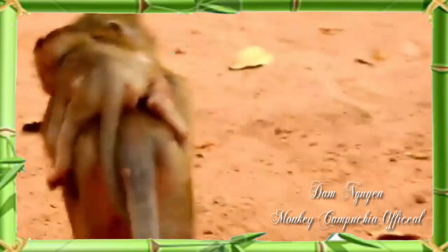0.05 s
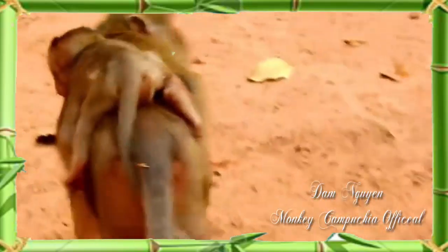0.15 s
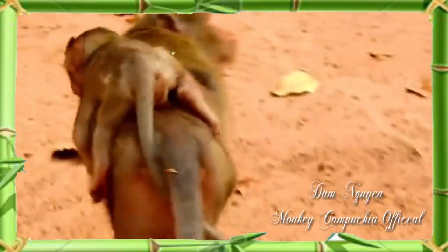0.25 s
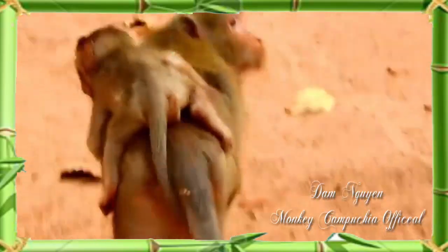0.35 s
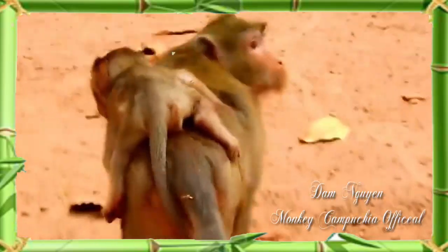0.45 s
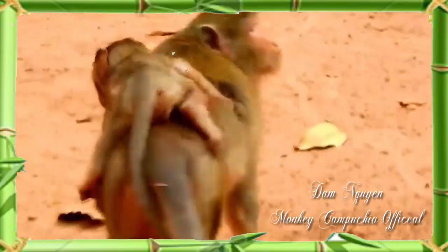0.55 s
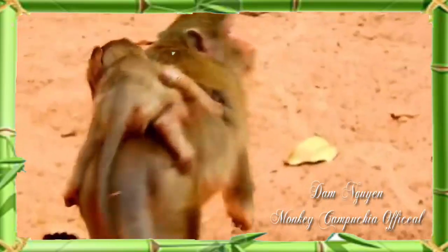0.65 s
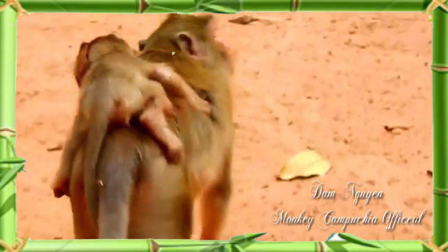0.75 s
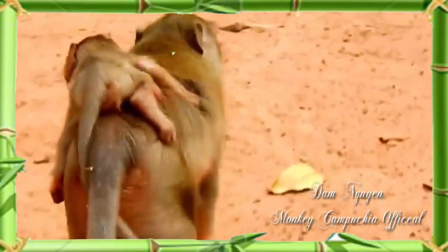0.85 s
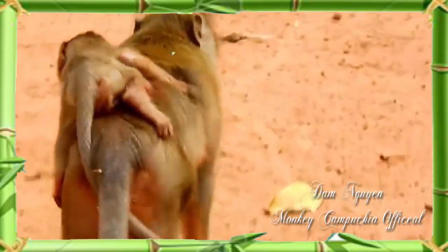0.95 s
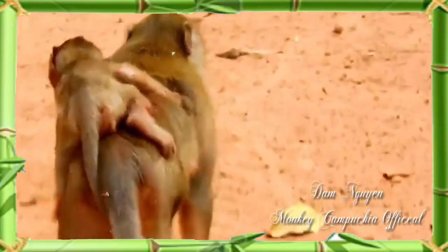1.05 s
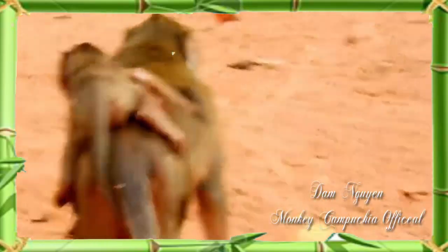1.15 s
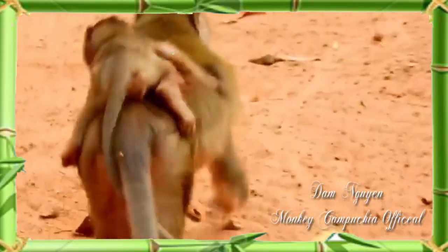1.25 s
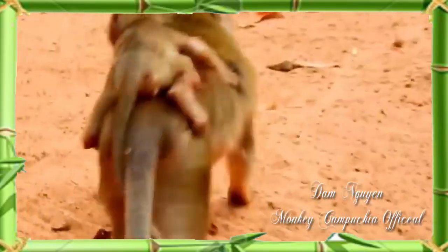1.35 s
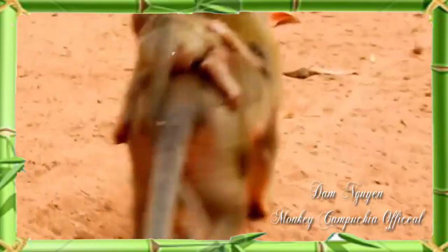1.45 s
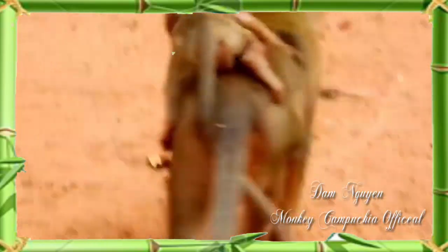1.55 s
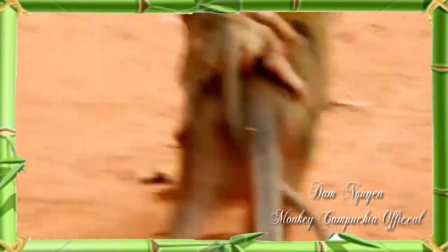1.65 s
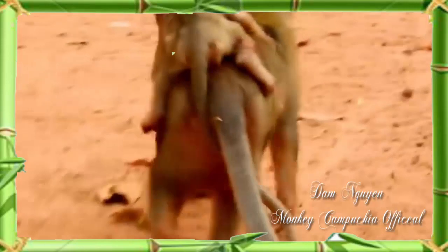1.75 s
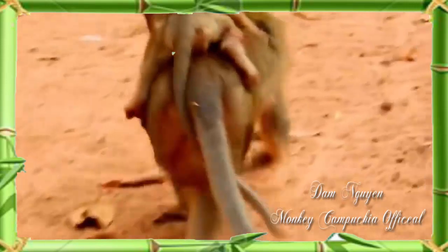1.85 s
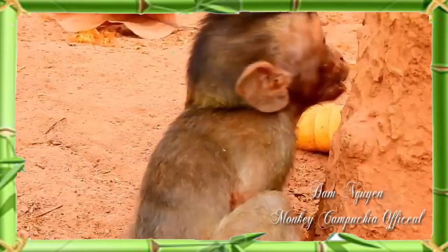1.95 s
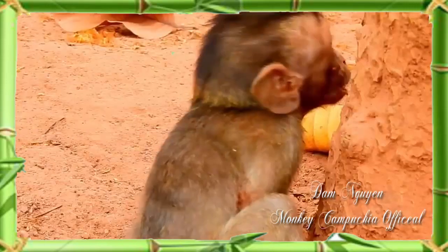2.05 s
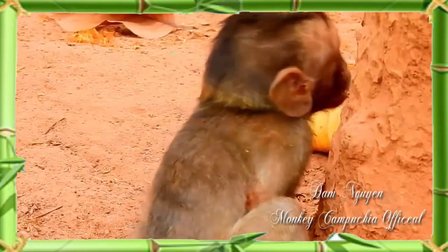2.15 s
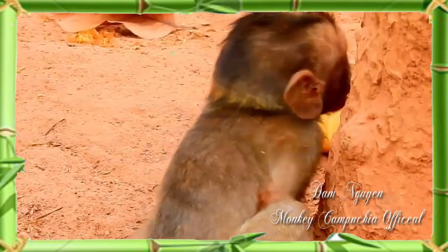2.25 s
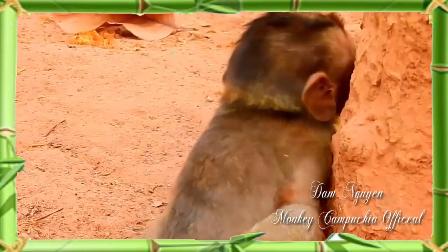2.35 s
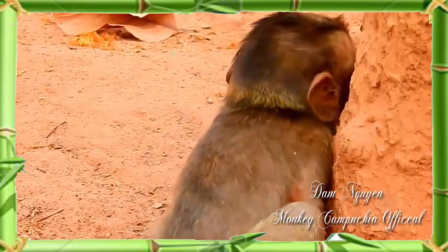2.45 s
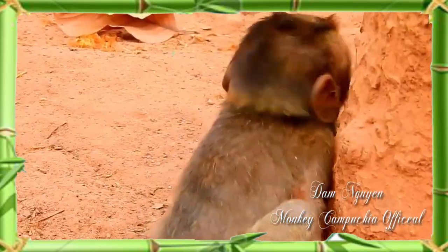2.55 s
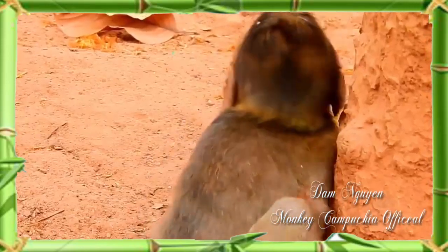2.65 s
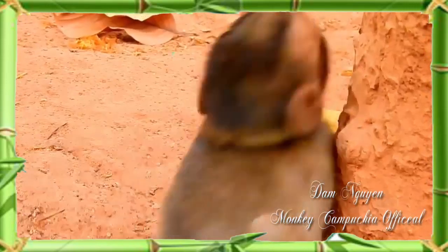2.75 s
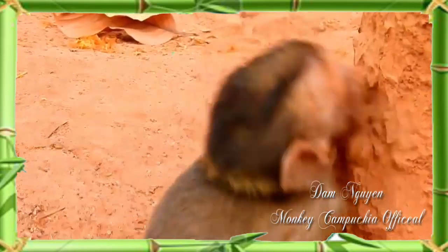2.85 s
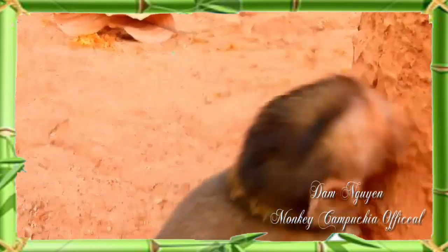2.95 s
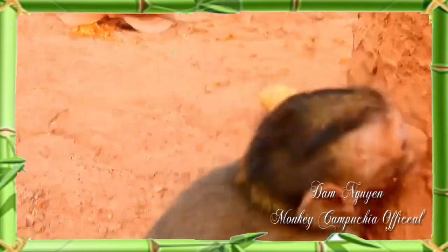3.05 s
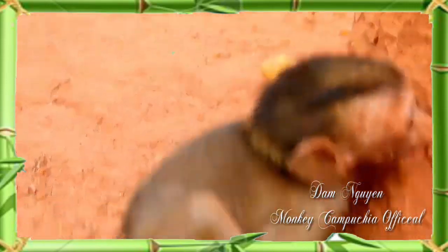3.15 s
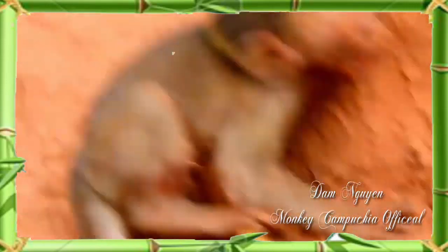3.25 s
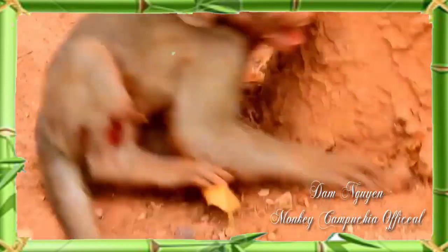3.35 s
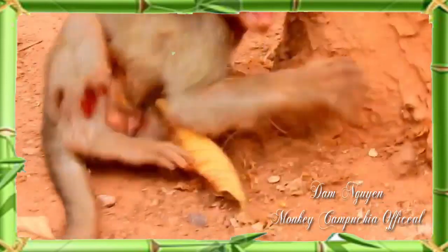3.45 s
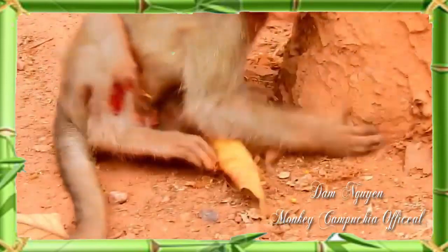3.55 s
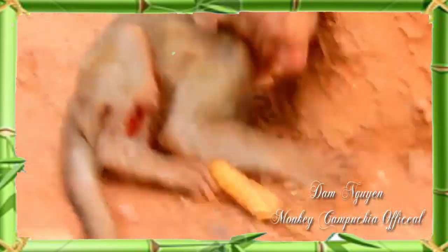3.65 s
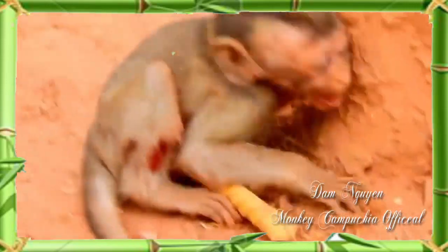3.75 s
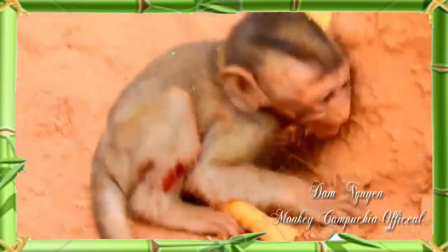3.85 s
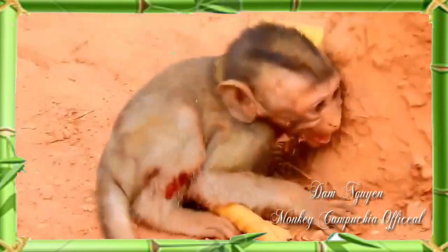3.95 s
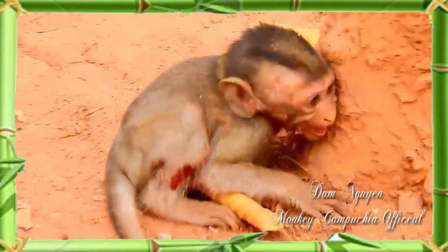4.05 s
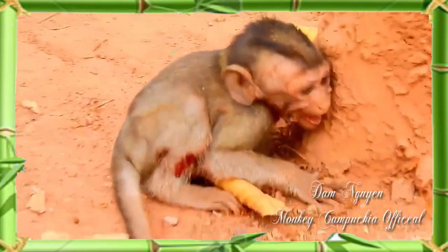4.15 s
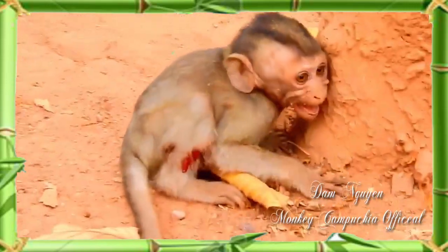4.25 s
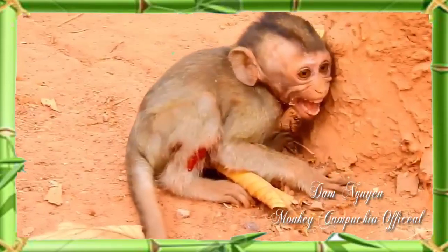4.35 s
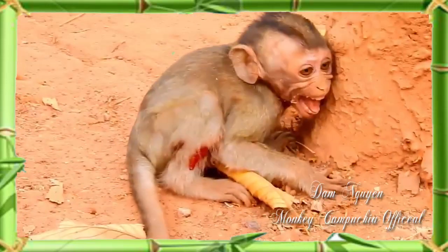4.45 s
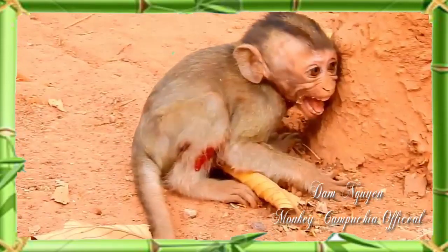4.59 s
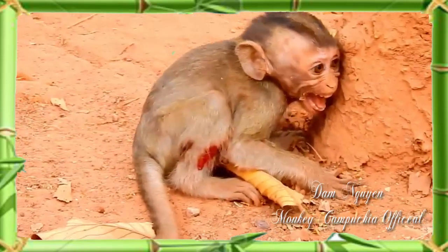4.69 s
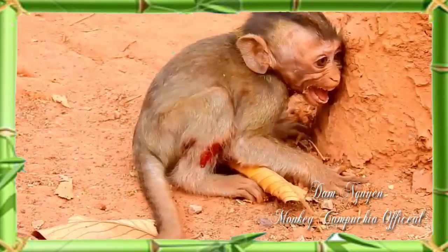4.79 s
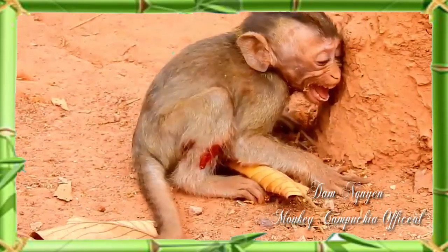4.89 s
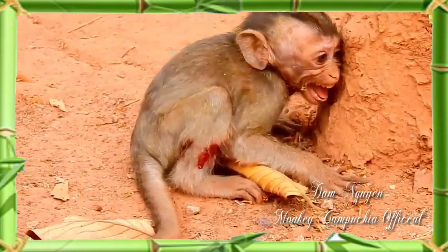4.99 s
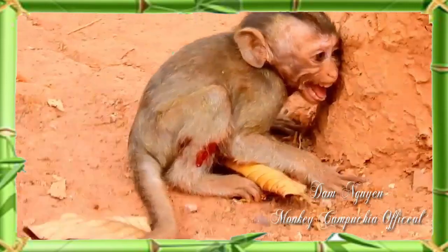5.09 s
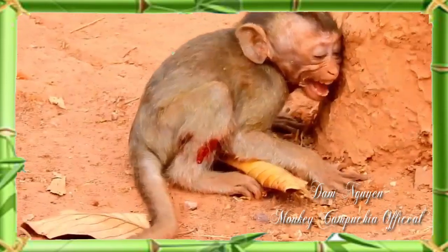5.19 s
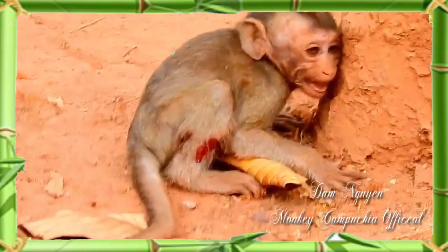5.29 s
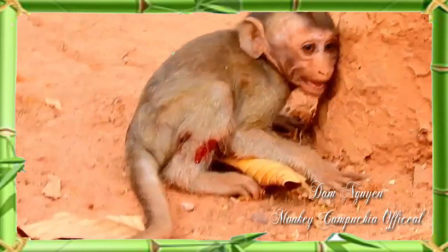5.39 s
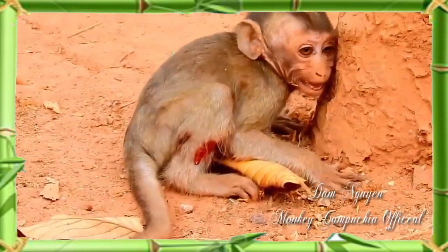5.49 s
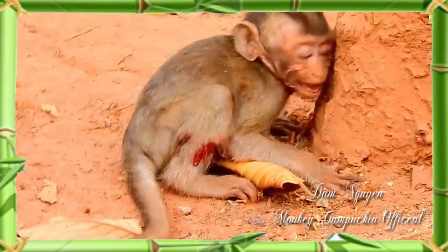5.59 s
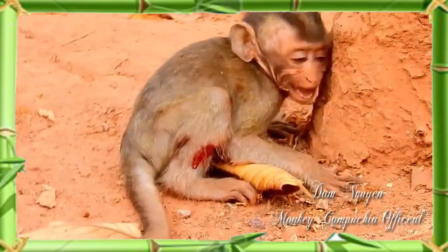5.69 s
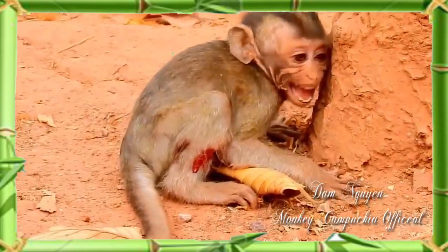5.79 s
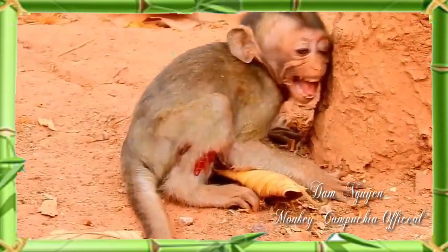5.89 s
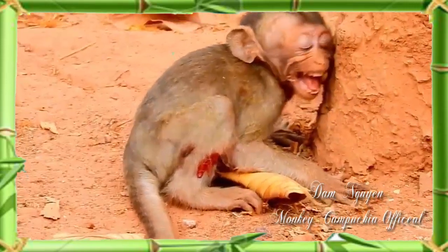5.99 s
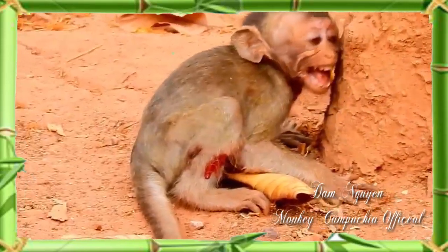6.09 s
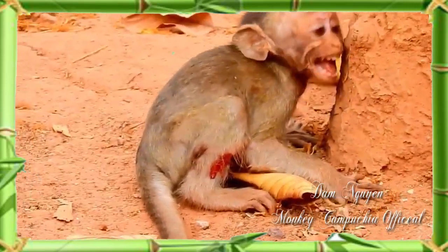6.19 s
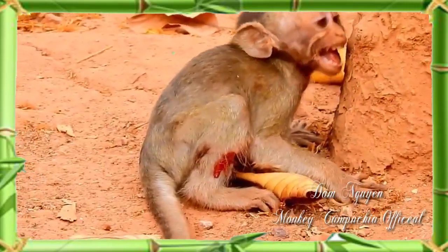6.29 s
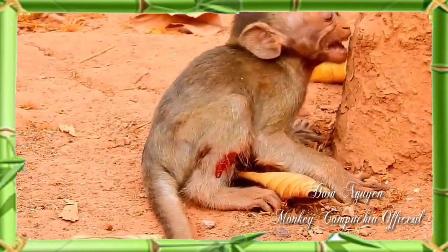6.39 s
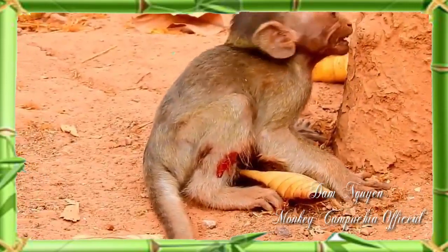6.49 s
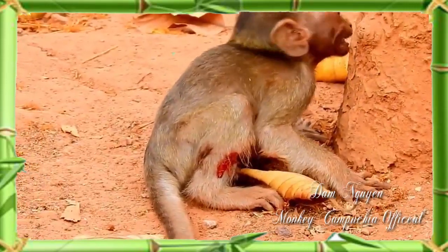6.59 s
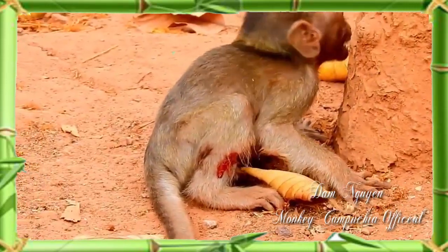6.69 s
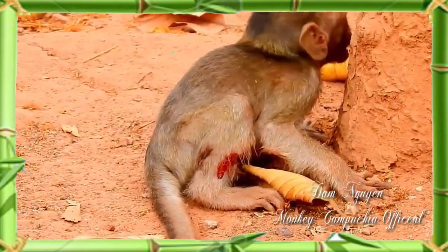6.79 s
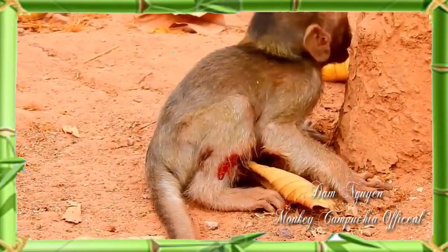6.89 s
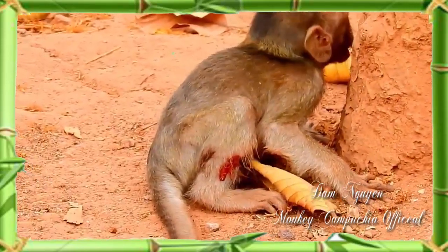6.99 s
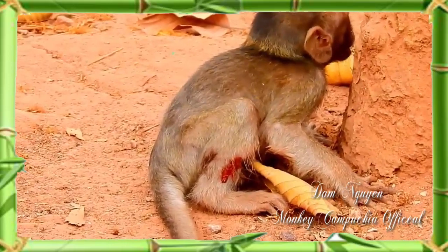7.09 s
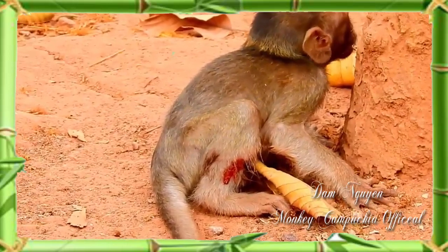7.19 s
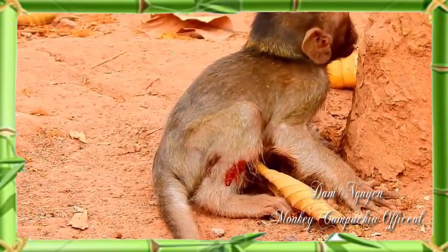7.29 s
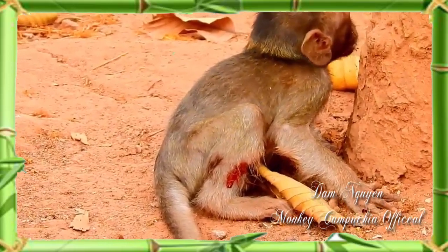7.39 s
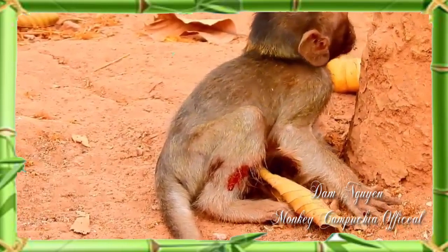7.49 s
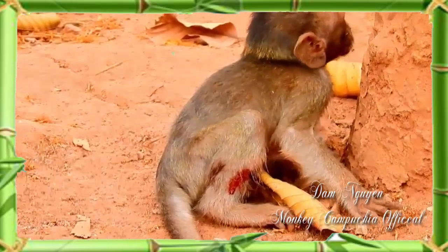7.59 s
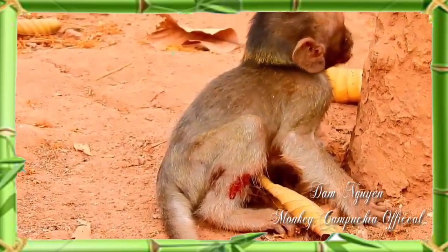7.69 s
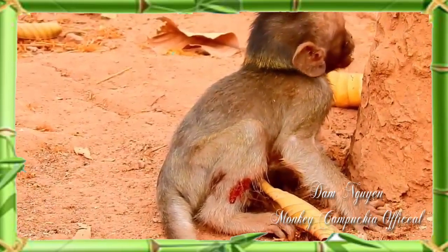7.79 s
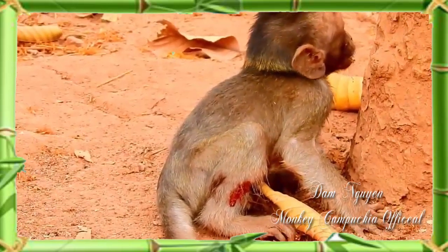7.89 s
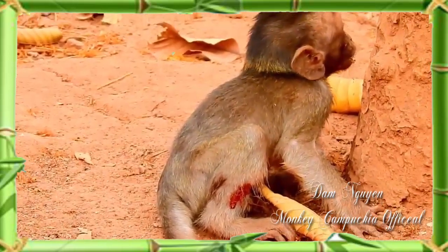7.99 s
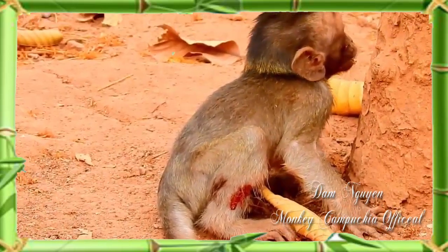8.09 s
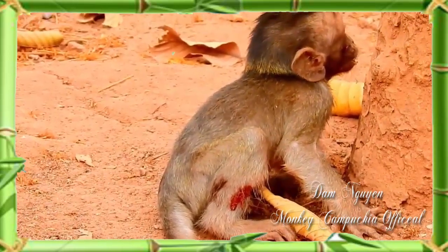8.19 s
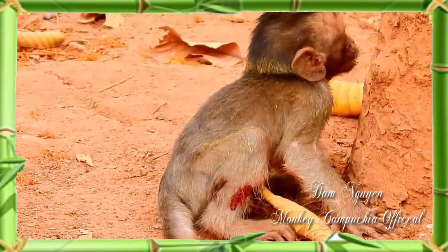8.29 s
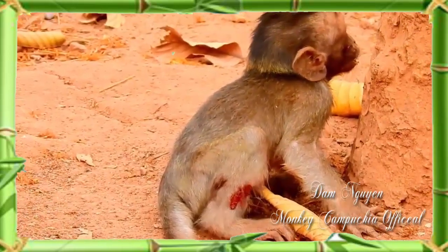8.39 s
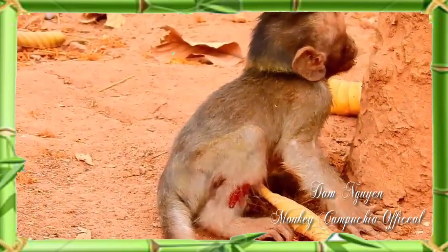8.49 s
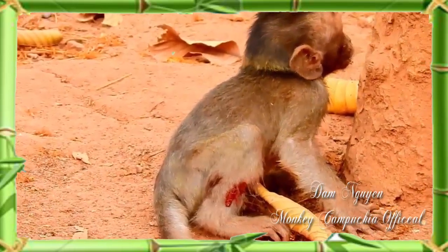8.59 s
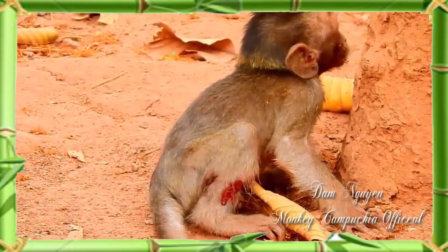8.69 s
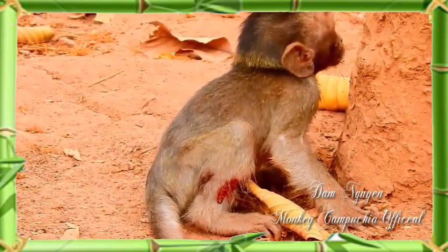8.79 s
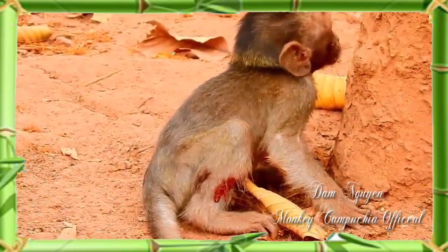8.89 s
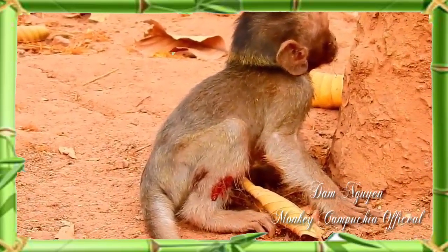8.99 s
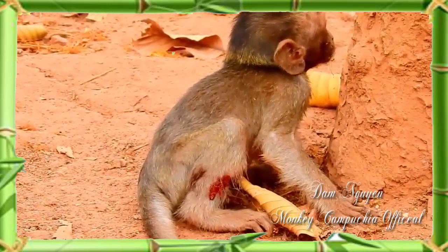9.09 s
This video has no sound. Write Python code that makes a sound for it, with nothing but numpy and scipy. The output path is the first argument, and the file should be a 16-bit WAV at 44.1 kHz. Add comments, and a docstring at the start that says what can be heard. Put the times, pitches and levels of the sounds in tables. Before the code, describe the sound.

Young monkeys on dry, open ground, heard close with very slight scattered echo. From 0 to 1.6 s, short hoarse barks and leaf swishes come in uneven bursts, with throaty grunts, a falling squeak and ticks of grit over a faint distant engine hum. At 2 s the windy background jumps up and a clear coo around 1500 Hz lasts a third of a second. Small rustles and squeaks lead to a harsh, torn scream from 2.8 to 4 s, shaking rapidly, with a tiny dropout near 3.85. At 4.4 s a piercing whistle sweeps up to about 10 kHz over rasp, trembling until 5.3; swishes and squeaks follow, then another shriek from 5.9 to 6.4 breaks into gasps. Wind and scuffing are louder here, then drop. A strong fluttering coo comes at 6.8-7.3, a weaker one at 7.8-8.5, leaving hum, scuffing and insect-like hiss slightly rising to the end.

```python
"""Young monkeys on dry ground, about nine seconds. First come hoarse barks and leaf swishes, made of lumpy noise
through moving resonances, with grunts and short gliding squeaks here and there; at 2 s a clear coo, built from
overtones. A harsh scream of fold pulses runs from 2.8 to 4 s, with a brief dropout, then whistled screams until
6.4 s; all shake with the body's tremor. Two more coos follow. Scuffing and a far engine's hum (tones and filtered
noise), wind and a hiss lie underneath, jumping in level near 2, 4 and 6.4 s; ringing bursts make ticks of grit."""
import sys
import numpy as np
from scipy import signal
from scipy.fft import rfft, irfft, next_fast_len
from scipy.io import wavfile
from scipy.ndimage import uniform_filter1d, map_coordinates

SR = 44100
rng = np.random.default_rng(int(sys.argv[2]) if len(sys.argv) > 2 else 0)


def unload_audio(sound):
    """Save the sound as a 16-bit wav file, at the path given as the first command line argument."""
    columns = np.transpose(np.atleast_2d(sound))
    # keep every value between -1 and 1, then stretch to whole-number steps
    steps = np.round(np.clip(columns, -1, 1) * 32767)
    wavfile.write(sys.argv[1], SR, steps.astype(np.int16))


def attenuation_scalar(level_db):
    """Turn a level in dB into a linear amplitude multiplier (20 dB per decade)."""
    decades = np.asarray(level_db, float) / 20
    return 10 ** decades


N = 403074
T = np.arange(N) / SR  # time of each sample in seconds


def unit(x):
    """Scales a sound to rms 1."""
    return x / np.sqrt(np.mean(x ** 2) + 1e-20)


def curves(tables, silent=None):
    """One value per sample for each column; with silent, the first two columns fall to it around each table."""
    rows = []
    for table in tables:
        if silent is None:
            rows += table
        else:
            first, last = table[0], table[-1]
            before = (first[0] - .002, silent, silent, *first[3:])
            after = (last[0] + .002, silent, silent, *last[3:])
            rows += [before, *table, after]
    s, *columns = np.transpose(rows)
    return [np.interp(T, s, column) for column in columns]


def turning(hz):
    """The phase in radians of a tone whose pitch follows hz."""
    return 2 * np.pi * np.cumsum(hz) / SR


def wobble(rate):
    """A smooth random curve through rate random points a second."""
    return map_coordinates(rng.standard_normal(int(N * rate / SR) + 4), [T * rate])


def torn(phase, width_hz):
    """A tone whose strength and sign leap about at random: a ragged band around its pitch."""
    return unit(wobble(width_hz) * np.sin(phase) + wobble(width_hz) * np.cos(phase))


def coloured(x, spectrum, lo_hz=0, hi_hz=SR):
    """Filters x through a spectrum between two edges, then scales it to rms 1."""
    size = next_fast_len(N + 8192)
    hz = np.fft.rfftfreq(size, 1 / SR)
    points_hz, points_db = np.transpose(spectrum)
    gain = attenuation_scalar(np.interp(np.log(hz + 1), np.log(points_hz + 1), points_db))
    gain = gain * (hz >= lo_hz) * (hz < hi_hz)
    return unit(irfft(rfft(x, size) * gain, size)[..., :N])


def pair(alike):
    """Left and right noises that share part of their motion: 1 is identical, 0 unrelated."""
    a, b = rng.standard_normal((2, N))
    turn = np.arccos(alike) / 2
    return np.cos(turn) * a + np.sin(turn) * b * [[1], [-1]]


def sided(x, db):
    """Makes left louder than right by db."""
    return x * attenuation_scalar(np.array([[.5], [-.5]]) * db)


# Level of the hiss over time: start_s, level_db
AIR_LEVEL = [
    [(0.3, -54), (0.372, -67), (0.674, -72.5), (0.8, -73)],
    [(1.58, -60), (1.798, -71.5), (2.0, -79.5)],
    [(2.03, -66), (2.188, -59), (2.296, -60), (2.6, -62.5)],
    [(4.06, -42), (4.152, -44.5), (4.36, -56)],
    [(5.3, -50.5), (5.38, -43.5)],
    [(5.58, -54), (5.68, -56)],
    [(6.5, -69.5), (6.616, -61), (6.85, -59.5)],
    [(7.36, -61.5), (7.726, -63.5), (7.87, -56.5), (8.082, -55.5), (8.444, -55), (9.14, -51)],
]
# Spectrum of the hiss: pitch_hz, level_db
HISS_SPECTRUM = [(1290, -11), (2200, -10), (3360, -1), (3710, 0.5), (4030, -1.5), (5670, 2.5), (6750, -0.5),
                 (7970, -4), (8800, -18.5), (14000, -21), (16000, -31.5)]


def air():
    """Far insects and leaves add up to a smooth hiss: filtered noise with a slow drift in level."""
    drift_db = 1.2 * wobble(12)
    return attenuation_scalar(curves(AIR_LEVEL)[0] + drift_db) * coloured(pair(0.99), HISS_SPECTRUM)


# Background levels, one list for each stretch of time: start_s, hum_db, scuff_db
GROUND_LEVELS = [
    [(0.0, -58, -55), (0.01, -68, -73), (0.18, -73, -61), (0.24, -64, -71), (0.28, -74, -54),
     (0.33, -65, -71.5), (0.43, -66, -43.5), (0.57, -70, -68), (0.83, -68, -69.5), (0.89, -65, -53.5),
     (1.05, -70, -65.5), (1.08, -70, -55), (1.38, -59.5, -64.5), (1.39, -65, -47.5), (1.66, -65, -56),
     (1.69, -61, -63), (1.98, -69, -66.5), (2.01, -47, -67.5)],
    [(2.01, -41, -46), (2.04, -37.5, -55), (2.16, -42.5, -52.5), (2.23, -41.5, -58.5), (2.32, -41.5, -58.5),
     (2.42, -47, -57.5), (2.47, -43, -56.5), (2.56, -43.5, -48.5), (2.8, -48, -56.5), (2.94, -51, -50),
     (2.98, -46.5, -53), (3.03, -55, -55), (3.36, -56, -44), (3.4, -61.5, -54), (3.53, -65.5, -51.5),
     (3.68, -62.5, -64.5), (3.96, -56, -42.5), (4.03, -59, -53.5)],
    [(4.05, -52, -43), (4.06, -47, -34), (4.17, -36, -35), (4.41, -44, -38.5), (4.48, -41.5, -35.5),
     (4.91, -42, -39), (5.15, -38, -39), (5.21, -38, -32), (5.26, -42.5, -52), (5.35, -31.5, -26),
     (5.46, -31.5, -33.5), (5.73, -36.5, -31), (6.01, -40, -34), (6.08, -46, -47), (6.13, -42, -39.5),
     (6.19, -35.5, -47), (6.25, -31, -38.5), (6.27, -36, -45), (6.29, -37, -35), (6.37, -40.5, -50),
     (6.42, -38, -49)],
    [(6.45, -47, -58), (6.49, -43, -51), (6.6, -46, -59), (6.61, -49, -46.5), (6.65, -44.5, -54.5),
     (6.76, -47, -58), (6.79, -47.5, -55.5), (7.14, -46, -56.5), (7.3, -45, -54), (7.36, -48.5, -56),
     (7.52, -44, -56.5), (7.78, -49, -59.5), (7.82, -47.5, -54.5), (7.95, -44, -55), (8.02, -51.5, -52),
     (8.09, -45, -54.5), (8.13, -48.5, -50), (8.25, -47, -53.5), (8.33, -48, -49), (8.59, -42.5, -51.5),
     (8.78, -42.5, -43), (9.05, -39, -43.5), (9.14, -40, -40)],
]
# Steady tones of the engine, relative to each other: pitch_hz, level_db
ENGINE_TONES = [(53.8, -61), (107.7, -74), (129.2, -46), (209.9, -63.5), (258.4, -58), (312.2, -54.5)]
# Spectra of engine rumble, wind and scuffing: pitch_hz, level_db
RUMBLE_SPECTRUM = [(15, -63.5), (25, -20), (75, -11), (130, 2), (153, -6.5), (194, -16.5), (317, -7.5),
                   (408, -11), (472, -11), (600, -22), (780, -59), (1320, -120)]
WIND_SPECTRUM = [(24, -45), (40, -12), (118, 0.5), (135, 3), (206, -6.5), (254, -13), (301, -12),
                 (335, -19), (427, -17.5), (500, -16.5), (650, -36), (1100, -120)]
SCUFF_SPECTRUM = [(210, -43), (350, -16.5), (548, -15.5), (601, -9.5), (729, -9), (1070, -3.5),
                  (1300, -1.5), (1410, -2), (2380, -5.5), (4000, -18), (5200, -57.5), (8800, -120)]
# How much louder left is than right (the calls column is used in scene): start_s, scuff_db, calls_db
SIDES = [(0.0, -5, -6), (0.2, 2, -1), (1.68, -0.5, -4), (1.96, -5, -2.5), (2.47, 5.5, -3), (4.89, -14.5, 0),
         (5.29, 0.5, 0), (6.11, -6.5, -1.5), (6.59, 15.5, 0.5), (7.2, 0, -2), (9.14, -0.5, 0.0)]


def ground():
    """A far engine gives tones and rumble, wind gives low noise, and feet in dirt and leaves give grainy noise."""
    hum_db, scuff_db = curves(GROUND_LEVELS)
    tones = 0
    for hz, db in ENGINE_TONES:
        tones = tones + attenuation_scalar(db + 1.7 * wobble(9.5)) * np.sin(2 * np.pi * hz * T + .5 * wobble(3.6))
    engine = 0.58 * unit(tones) + 0.59 * coloured(pair(1.0), RUMBLE_SPECTRUM)

    # wind differs more between left and right in its lowest part
    breeze = 0.33 * coloured(pair(0.43), WIND_SPECTRUM, hi_hz=107)
    breeze = breeze + 0.74 * coloured(pair(.85), WIND_SPECTRUM, lo_hz=110)
    windy = np.interp(T, [2, 2.01, 6.3, 6.5], [0.6, 1.0, 0.94, 0.045])  # balance from engine (0) to wind (1)
    hum = np.sqrt(1 - windy) * engine + np.sqrt(windy) * breeze

    near = np.interp(T, [6.6, 6.8], [1, .3])  # far scuffing blurs
    grit = attenuation_scalar(near * (2.42 * wobble(300) + 1.7 * wobble(40)))
    scuff = 0.21 * coloured(grit * pair(1.0), SCUFF_SPECTRUM, hi_hz=820)
    scuff = scuff + 0.81 * coloured(grit * pair(0.88), SCUFF_SPECTRUM, lo_hz=795)
    scuff_side_db = curves([SIDES])[0]
    return attenuation_scalar(hum_db) * sided(hum, -1.6) + attenuation_scalar(scuff_db) * sided(scuff, scuff_side_db)


# Scuffs and ticks, with levels relative to each other: start_s, level_db, pitch_hz
TICKS = [(0.084, -17.5, 5470), (0.376, -42, 1730), (0.635, -34, 5240), (0.744, -45.5, 1183),
         (1.224, -26.5, 1870), (1.395, -19.5, 2740), (1.442, -34.5, 5570), (1.47, -19.5, 2730),
         (1.64, -23.5, 1670), (2.45, -33.5, 2210), (2.472, -31, 2410), (5.361, -14.5, 1240),
         (6.614, -40.5, 1740)]


def ticks():
    """Grit and twigs: each a short burst ringing at its own pitch and dying by 60 dB in 15 ms."""
    out, t = np.zeros(N), T[:1500]
    for s, db, hz in TICKS:
        rough = 1 + 0.4 * uniform_filter1d(rng.standard_normal(len(t)), size=5)
        burst = np.sin(2 * np.pi * hz * t) * rough
        attack = np.minimum(t / .0004, 1)
        start = round(s * SR)
        out[start:start + len(t)] += attenuation_scalar(db - 13 - 60 * t / .015) * burst * attack
    return out


# Throaty grunts: start_s, length_s, pitch_hz (the band glides down around it), level_db
GRUNTS = [(0.372, 0.14, 1488, -46.5), (0.927, 0.035, 1104, -47), (1.077, .08, 1310, -50.5),
          (1.393, 0.0285, 2596, -33), (1.389, 0.049, 1200, -39.5), (1.462, 0.096, 1622, -38),
          (2.457, 0.12, 2344, -38.5), (3.346, 0.017, 1298, -32), (5.3, .07, 1305, -32),
          (6.472, 0.12, 1396, -46)]


def grunts():
    """Low rough puffs that start sharply and sag in pitch."""
    out = np.zeros(N)
    for s, length, hz, db in GRUNTS:
        u = np.clip((T - s) / length, 0, 1)  # progress through the grunt
        shape = np.minimum(u * length / .003, 1) * (1 - u) ** 0.99
        out += attenuation_scalar(db) * shape * torn(turning(hz * (1.08 - .2 * u)), 0.61 * hz)
    return out * attenuation_scalar(2.4 * wobble(150))


# Squeaks, with levels relative to each other: start_s, length_s, from_hz, to_hz, level_db
SQUEAKS = [(1.284, 0.091, 8200, 3900, -29), (2.657, 0.11, 3000, 12000, -39.5),
           (2.78, 0.073, 12000, 10500, -48), (3.08, 0.11, 9040, 8860, -22.5),
           (3.903, 0.0064, 4400, 4300, -13.5), (4.013, 0.016, 8200, 5330, -13),
           (4.375, 0.048, 3200, 4750, -18.5), (5.69, .04, 1200, 1810, -28.5),
           (5.705, 0.028, 6400, 8000, -29.5), (5.724, 0.021, 6000, 7870, -26),
           (5.726, .04, 2300, 2960, -22), (5.748, 0.026, 7100, 8200, -36), (5.805, 0.029, 5800, 8220, -19),
           (6.391, 0.037, 7100, 7280, -24), (6.433, 0.013, 7540, 4270, -15.5)]


def squeaks():
    """Short whistles that glide from one pitch to another and waver a little."""
    out, waver = np.zeros(N), 1 + 0.016 * wobble(500)
    for s, length, from_hz, to_hz, db in SQUEAKS:
        u = np.clip((T - s) / length, 0, 1)
        span = (u > 0) & (u < 1)
        hz = (from_hz + (to_hz - from_hz) * u[span]) * waver[span]
        swell = np.sin(np.pi * u[span]) ** 0.66
        out[span] += attenuation_scalar(db + 1) * swell * np.sin(turning(hz))
    return out * attenuation_scalar(1.4 * wobble(200))


# The three coos, levels before drift and flutter: start_s, pitch_hz, fundamental_db, strongest_db, next_db
COO_A, COO_B, COO_C = [(2.012, 1485, -46, -35.5, -43), (2.05, 1458, -40.5, -40, -49),
                       (2.078, 1437, -47, -45.5, -62), (2.112, 1530, -51, -29.5, -40.5),
                       (2.166, 1622, -56, -31.5, -46), (2.26, 1677, -87, -34, -54),
                       (2.33, 1530, -66, -33, -42)], [(6.76, 1107, -75, -70.5, -82), (6.786, 1143, -49, -77, -87),
                                      (6.858, 1204, -57, -72, -60), (6.914, 1406, -56, -42.5, -30.5),
                                      (7.004, 1358, -52, -46.5, -38), (7.086, 1511, -63, -21.5, -39),
                                      (7.164, 1449, -62, -25, -33), (7.234, 1358, -47, -37.5, -56),
                                      (7.308, 1257, -47, -44.5, -81), (7.335, 1240, -62, -60, -76)], [(7.8, 1264, -66, -63, -87),
                                                     (7.83, 1179, -58, -72, -88),
                                                     (7.908, 1297, -53.5, -43.5, -88),
                                                     (7.956, 1306, -57, -44.5, -104),
                                                     (8.1, 1348, -55, -48.5, -55),
                                                     (8.306, 1308, -52, -50.5, -69),
                                                     (8.356, 1278, -47, -58, -65),
                                                     (8.412, 1270, -50, -53, -60),
                                                     (8.422, 1240, -49, -49, -88),
                                                     (8.5, 1140, -67, -69.5, -69)]
# Weaker overtones of each coo: multiple of the pitch, level_db relative to the strongest overtone
FAINT_A, FAINT_B, FAINT_C = [(4, -21), (5, -23), (6, -36), (7, -41)], [(2, -25.5), (5, -44), (6, -44.5)], [(2, -17), (4, -26), (5, -24), (7, -23),
                                                               (9, -25)]


def coo(table, strong, faint):
    """A clean call of whole-number overtones; when pushed hard it flutters and frays."""
    pitch_hz, *levels = curves([table])
    strongest_db = levels[1]
    strain = np.clip((strongest_db + 35) / 10, 0, 1)
    phase = turning(pitch_hz * (1 + 0.003 * wobble(120)))
    flutter = 1 + .45 * strain * np.sin(2 * np.pi * 112 * T + .8 * wobble(30))
    flutter = flutter + .25 * strain * np.sin(2 * np.pi * 56 * T)
    overtones = [*zip(strong, levels), *[(k, strongest_db + db) for k, db in faint]]
    voice = 0
    for k, db in overtones:
        level = attenuation_scalar(db + 3 + 1.2 * wobble(70) + 1.8 * wobble(18))
        frayed = (.07 + .2 * strain) * torn(k * phase, 450)
        voice = voice + level * (np.sin(k * phase) + frayed)
    start, end = table[0][0], table[-1][0]
    edge = np.clip(np.minimum((T - start) / 0.002, (end - T) / 0.035), 0, 1)
    return voice * flutter * edge


def coos():
    """All three coos; each names the multiples of its pitch that its three level columns drive."""
    return coo(COO_A, (1, 2, 3), FAINT_A) + coo(COO_B, (1, 3, 4), FAINT_B) + coo(COO_C, (1, 3, 6), FAINT_C)


def rasp(grain_db, rate):
    """Rough, chaotic sound: noise broken into uneven lumps."""
    return unit(rng.standard_normal(N) * attenuation_scalar(grain_db * wobble(rate)))


def throat(x, spectrum, low_db, high_db, low_hz, high_hz, split_hz, focus, width_hz):
    """Low and high resonances open apart, each with a ragged peak at its own pitch curve."""
    low_peak, high_peak = [torn(turning(hz), width_hz) for hz in (low_hz, high_hz)]
    low = unit(coloured(x, spectrum, hi_hz=split_hz) + focus * low_peak)
    high = unit(coloured(x, spectrum, lo_hz=split_hz) + focus * high_peak)
    return attenuation_scalar(low_db) * low + attenuation_scalar(high_db) * high


# Hoarse barks and leaf swishes, in lists that each fall silent at both ends:
# start_s, low_band_db, high_band_db, low_peak_hz
BARKS_AND_SWISHES = [
    [(0.0, -37, -46, 4950), (0.02, -36, -33.5, 4900), (0.038, -33, -50, 4860), (0.075, -72, -66, 4190)],
    [(0.075, -60, -60, 5100), (0.081, -47, -54.5, 5280), (0.115, -58, -62, 5180)],
    [(0.115, -36, -53, 4610), (0.155, -32, -35, 5020), (0.199, -35.5, -40.5, 5010), (0.212, -40, -57, 5030)],
    [(0.216, -48, -60, 4290), (0.238, -49, -57, 4390), (0.284, -42, -40, 5210), (0.324, -69, -68, 5100),
     (0.36, -78, -66, 5170)],
    [(0.36, -66, -69, 4800), (0.374, -85, -79, 4570), (0.44, -49, -63, 4700), (0.5, -76, -66, 4320),
     (0.56, -87, -67, 3280)],
    [(0.62, -82, -68, 5430), (0.638, -68, -69, 5520), (0.676, -82, -64, 5500), (0.7, -82, -76, 5070)],
    [(0.8, -85, -81, 3460), (0.838, -51, -52.5, 3520), (0.892, -44, -39, 5280), (0.922, -52, -51, 5070),
     (1.02, -84, -71, 3840)],
    [(1.052, -53, -63, 5290), (1.062, -33, -40, 5350), (1.14, -33.5, -40.5, 5310),
     (1.165, -36, -56.5, 4900)],
    [(1.169, -50, -51.5, 4450), (1.217, -54, -57, 5300), (1.26, -63, -65, 4960)],
    [(1.265, -36, -80, 5040), (1.277, -33, -38, 5220), (1.335, -52, -45, 5750), (1.385, -53, -59.5, 4580)],
    [(1.388, -56, -54.5, 2846), (1.396, -31.5, -36.5, 2800), (1.41, -48, -50.5, 2760),
     (1.46, -44, -55, 4590)],
    [(1.46, -53, -55, 3590), (1.474, -35, -43, 3320), (1.52, -54, -56, 3100), (1.58, -79, -71, 5340)],
    [(2.44, -79, -85, 2910), (2.476, -55, -81, 2700), (2.574, -56, -55.5, 5320), (2.634, -46.5, -59, 3590),
     (2.69, -44.5, -34, 6000), (2.774, -62, -54, 5680), (2.8, -60, -52.5, 6000)],
    [(5.26, -45, -17, 4460), (5.27, -45, -44, 4250), (5.304, -31.5, -42, 4280), (5.368, -84, -48.5, 3230),
     (5.458, -43, -31.5, 4030), (5.562, -65, -51, 2800), (5.614, -66, -57, 2980), (5.7, -65, -48, 2710)],
    [(5.7, -63, -44, 2860), (5.738, -37, -38, 2690), (5.786, -75, -61, 2810), (5.82, -41.5, -33, 6020),
     (5.868, -79, -45.5, 2960), (5.97, -60, -46.5, 2780)],
    [(6.44, -52, -24.5, 5670), (6.454, -36.5, -45, 5570), (6.58, -62, -58, 5450), (6.622, -55, -52, 3360),
     (6.66, -61, -59.5, 3970)],
]
# Their spectrum: pitch_hz, level_db
BARK_SPECTRUM = [(1180, -54.5), (2000, -25.5), (2850, -2), (3570, 1.5), (4080, -1.5), (5160, 3), (5620, 7),
                 (7280, -12.5), (8450, -17.5), (9280, -21), (10300, -26), (11600, -36.5), (13000, -43.5)]


def barks_and_swishes():
    """Lumpy noise through moving resonances: hoarse barks, and swishes of leaves."""
    low_db, high_db, low_hz = curves(BARKS_AND_SWISHES, -100)
    high_hz = 7200 + 0 * T
    return throat(rasp(4.3, 900), BARK_SPECTRUM, low_db, high_db, low_hz, high_hz,
                  split_hz=6200, focus=0.94, width_hz=1300)


# Crests of the body's tremor: time_s
TREMOR_CRESTS = [2.95, 3.001, 3.045, 3.099, 3.15, 3.2, 3.254, 3.33, 3.38, 3.427, 3.491, 3.536, 3.588, 3.649,
                 3.701, 3.748, 3.801, 4.49, 4.538, 4.592, 4.639, 4.686, 4.735, 4.784, 4.84, 4.9, 4.961,
                 5.017, 5.067, 5.128, 5.185, 5.24, 5.85, 5.892, 5.93, 5.962, 6.005, 6.07, 6.141, 6.193,
                 6.246, 6.3, 6.36, 6.411, 6.46]


def tremor():
    """The body's shake, from -1 to 1, peaking at every crest."""
    return np.cos(2 * np.pi * np.interp(T, TREMOR_CRESTS, np.arange(len(TREMOR_CRESTS))))


# Throat of the long harsh scream, peaks before the shake:
# start_s, low_throat_db, high_throat_db, low_peak_hz, high_peak_hz
SCREAM_MOUTH = [
    [(2.8, -41, -46, 5770, 6770), (2.842, -39.5, -47.5, 4730, 7270), (2.924, -24, -31.5, 4830, 7070),
     (2.962, -30.5, -31, 4890, 7200), (3.002, -25, -22.5, 4620, 7240), (3.034, -25, -26.5, 4560, 7870),
     (3.154, -28, -30.5, 5496, 8890), (3.23, -29.5, -27, 4720, 6940), (3.262, -25.5, -25, 4675, 6770),
     (3.404, -24.5, -23.5, 4570, 7320), (3.464, -26, -22, 5340, 7840), (3.558, -28.5, -21.5, 5850, 7190),
     (3.77, -26.5, -22, 5160, 8580), (3.832, -22, -23, 4890, 6910), (3.844, -24, -38.5, 4940, 6770)],
    [(3.861, -10.5, -27.5, 5140, 6500), (3.865, -22.5, -27, 5120, 6130), (3.963, -21.5, -29, 4510, 6850),
     (4.027, -26, -38.5, 5730, 6630), (4.035, -33.5, -58, 5730, 6500)],
]
# Its vocal folds, pulse rate before the shake: start_s, pulse_hz, orderly_share (0 to 1)
SCREAM_FOLDS = [(2.8, 1050, .05), (3.0, 1050, .1), (3.05, 1050, .4), (3.1, 1050, .1), (3.33, 1040, .15),
                (3.38, 1050, .7), (3.43, 1020, .5), (3.47, 1050, .8), (3.6, 1030, .7), (3.65, 1060, .7),
                (3.72, 1010, .6), (3.78, 1050, .1), (4.04, 1050, .1)]
# Spectrum of the screaming throat: pitch_hz, level_db
SCREAM_THROAT = [(1470, -69), (2500, -18), (2970, -13.5), (3570, -8.5), (3830, -3), (4080, -3), (4410, 4),
                 (5480, 0), (6110, 0.5), (7470, -5), (10400, -7), (13000, -22.5), (15000, -30),
                 (16000, -40)]


def scream():
    """Fold pulses whose rate follows the tremor; in chaos every overtone tears and strays on its own."""
    pulse_hz, orderly = curves([SCREAM_FOLDS])
    shake = tremor()
    phase = turning(pulse_hz * (1 + .045 * shake + .012 * wobble(120)))

    pulses = 0
    for k in range(5, 11):
        focus_db = -.6 * (k - 7.3) ** 2  # overtones near the mouth resonance are loudest
        pulses = pulses + np.cos(k * phase + 0.81 * wobble(250)) * attenuation_scalar(focus_db + 4.25 * wobble(45))

    shreds = 0
    for k in range(4, 14):
        stray = k * phase + turning(450 * wobble(40))
        shreds = shreds + torn(stray, 520) * attenuation_scalar(5 * wobble(40))

    chaos = .75 * unit(shreds) + .65 * rasp(1.5, 400)
    source = np.sqrt(orderly) * .9 * unit(pulses) + np.sqrt(1 - orderly) * chaos
    low_db, high_db, low_hz, high_hz = curves(SCREAM_MOUTH, -100)
    return throat(source, SCREAM_THROAT, low_db, high_db, low_hz * (1 + .03 * shake),
                  high_hz * (1 + 0.023 * shake), split_hz=6520, focus=0.45, width_hz=600)


# Whistled screams, levels before throb and ragged drift: start_s, lower_voice_db, whistle_db
SHRILL_LEVELS = [
    [(4.372, -40, -76), (4.382, -8, -29), (4.416, -14.5, -30.5), (4.46, -31, -44.5)],
    [(4.46, -25.5, -40), (4.514, -26, -39.5), (4.592, -19.5, -36.5), (4.716, -21, -30.5),
     (4.73, -30, -28.5), (4.78, -18.5, -37.5), (4.92, -26, -25.5), (4.932, -24.5, -34.5),
     (4.946, -38, -22.5), (4.958, -19.5, -29), (5.074, -29.5, -38.5), (5.21, -41, -22)],
    [(5.21, -27, -21.5), (5.222, -23, -25), (5.254, -23, -38), (5.27, -62, -46)],
    [(5.87, -46, -60), (5.878, -61, -34.5), (5.962, -52, -39.5), (6.0, -25, -34), (6.02, -34, -32.5)],
    [(6.02, -34, -37.5), (6.038, -19, -39.5), (6.082, -17.5, -34.5), (6.11, -30, -31.5),
     (6.278, -28, -32.5), (6.29, -23.5, -32.5), (6.424, -28.5, -37), (6.445, -40, -69)],
]
# The whistle, pitch before the shake: start_s, pitch_hz, tremor_depth (share of pitch), hoarse_share (0 to 1)
WHISTLE = [(4.372, 3500, 0, 0), (4.388, 4200, 0.019, 0.06), (4.402, 6800, 0.0015, 0.1), (4.42, 9000, 0, .2),
           (4.44, 10440, 0.012, 0.4), (4.5, 10500, 0.029, 0.8), (4.56, 10030, 0.028, 0.3),
           (4.8, 10210, 0.031, 0.22), (4.9, 9880, 0.025, 0.04), (5.0, 9850, 0.048, 0.02),
           (5.12, 9960, 0.036, 0.06), (5.19, 10320, 0.033, 0.01), (5.215, 9770, 0.021, 0.03),
           (5.23, 6950, 0.017, 0.27), (5.27, 7070, 0, 0.1), (5.87, 10130, 0.0042, .05),
           (5.885, 11130, .03, .05), (5.96, 11660, .02, .05), (5.985, 10790, .01, 0),
           (6.02, 10300, 0.0044, 0.17), (6.045, 9010, 0.017, 0.42), (6.085, 8940, 0.02, 0.5),
           (6.12, 7950, 0.053, 0.77), (6.2, 8150, 0.069, 0.87), (6.445, 8240, 0.068, .8)]
# Moments when the lower voice locks at half the whistle: start_s, end_s
LOCKED_SPANS = [(4.54, 4.592), (4.622, 4.652), (4.772, 4.802), (4.82, 4.905), (4.955, 4.987),
                (4.995, 5.045), (5.055, 5.1), (5.11, 5.13), (5.97, 6.09), (6.128, 6.15), (6.185, 6.205),
                (6.238, 6.255), (6.285, 6.315), (6.35, 6.372)]
# Spectrum of the shrill throat: pitch_hz, level_db
SHRILL_THROAT = [(1760, -58.5), (3000, -31), (3310, -27), (4000, -25.5), (4290, 10.5), (5110, -8.5),
                 (5440, 0.5), (5960, -0.5), (6390, 3), (6900, -8), (8580, -16), (10600, -17), (14800, -39),
                 (16000, -50)]


def shrill():
    """A whistle shaken by the tremor; a lower voice either locks at half its pitch or breaks into rasp."""
    low_db, high_db = curves(SHRILL_LEVELS, -100)
    pitch_hz, depth, hoarse = curves([WHISTLE])
    shake = tremor()
    phase = turning(pitch_hz * (1 + depth * shake + .006 * wobble(400)))
    locked = sum((T > start) * (T < end) for start, end in LOCKED_SPANS) * 1.
    locked = uniform_filter1d(locked, size=350)  # soft edges
    chaos = rasp(3.2, 700)

    clear = 1.2 * np.sin(phase / 2) * attenuation_scalar(1.5 * wobble(200)) + .3 * torn(phase / 2, 500)
    centre = turning(np.clip(pitch_hz * .53, 4300, 6000))
    broken = .55 * coloured(chaos, SHRILL_THROAT, hi_hz=7700) + .8 * torn(centre, 1500)
    growth = np.interp(T, [4.39, 4.445], [.2, 1])  # the rasp grows out of the first glide
    lower = locked * clear + (1 - .87 * locked) * broken * growth

    # a further ragged band opens in the last scream
    third = (T > 6.1) * .5 * torn(phase * 1.3, 680) * attenuation_scalar(4.3 * wobble(40))
    ragged = 0.33 * torn(phase, 600) * attenuation_scalar(3 * wobble(40))
    hiss = 0.91 * (1 - 0.45 * locked) * coloured(chaos, SHRILL_THROAT, lo_hz=8200)
    breath = third + ragged + hiss
    pure = np.sin(phase) * attenuation_scalar(3.05 * wobble(120)) * (T < 6.12)  # no pure whistle after this
    upper = np.sqrt(2 - 2 * hoarse) * pure + np.sqrt(hoarse) * breath

    # the last scream breaks into harsh gasps, one a shake
    gasps = np.clip((T - 6.08) / .04, 0, 1)
    throb = attenuation_scalar(gasps * (6.5 * shake - 2))
    lower = lower + gasps * .7 * torn(phase / 2, 700)
    return attenuation_scalar(low_db) * throb * lower + attenuation_scalar(high_db) * upper


def echoes(x, t60):
    """Ground and trunks scatter the calls, differently to each side; t60 is seconds to fade by 60 dB."""
    t = T[:SR // 3]
    tail = rng.standard_normal((2, len(t))) * attenuation_scalar(-60 * t / t60)
    return signal.fftconvolve(x[None], tail / np.linalg.norm(tail[0]), axes=1)[:, :N]


def scene():
    """All calls, swishes and ticks with their echoes, over the ground and air."""
    calls = barks_and_swishes() + grunts() + scream() + shrill() + squeaks() + coos() + ticks()
    scattered = attenuation_scalar(-8.5) * echoes(calls, .03) + attenuation_scalar(-19) * echoes(calls, .18)
    calls_side_db = curves([SIDES])[1]
    return sided(calls, calls_side_db) + scattered + ground() + air()


def top_cut(x):
    """Nothing passes above the cut-off."""
    return signal.sosfilt(signal.butter(12, 16540, fs=SR, output="sos"), x)


# The brief dropout: start_s, end_s
DROPOUT = (3.845, 3.861)


def record(dry):
    """The input stage rounds off the loudest peaks, and everything drops out for a moment."""
    soft = dry / (1 + np.abs(dry / .55) ** 3) ** (1 / 3)
    sounding = ((T < DROPOUT[0]) | (T > DROPOUT[1])) * 1.
    mute = np.maximum(uniform_filter1d(sounding, size=40), attenuation_scalar(-62))
    return top_cut(soft * mute)


dry = scene()
out = record(dry)
unload_audio(out)
```